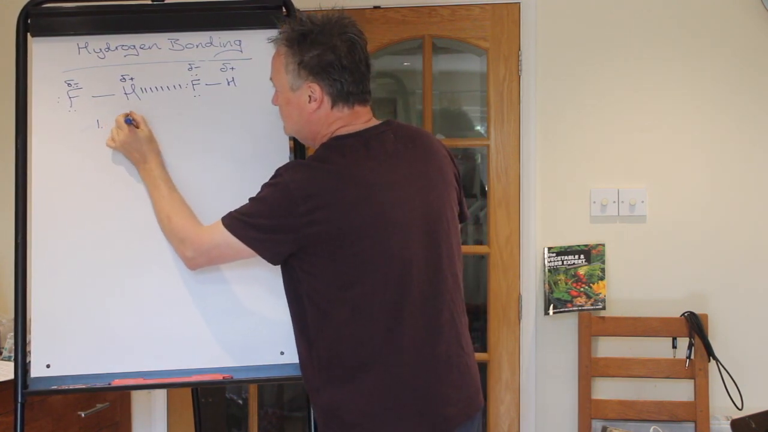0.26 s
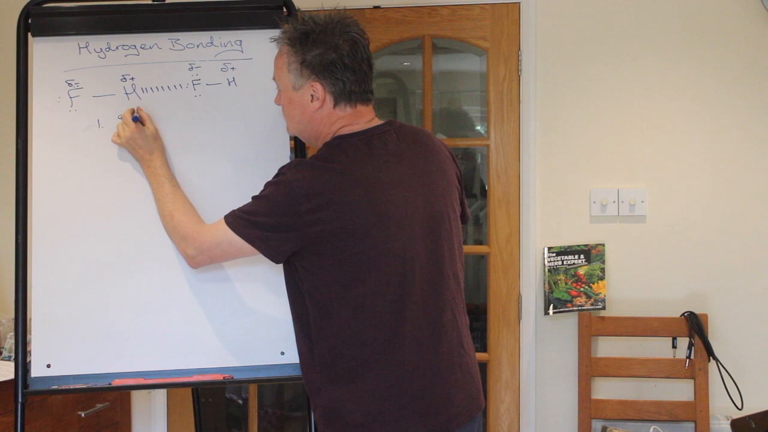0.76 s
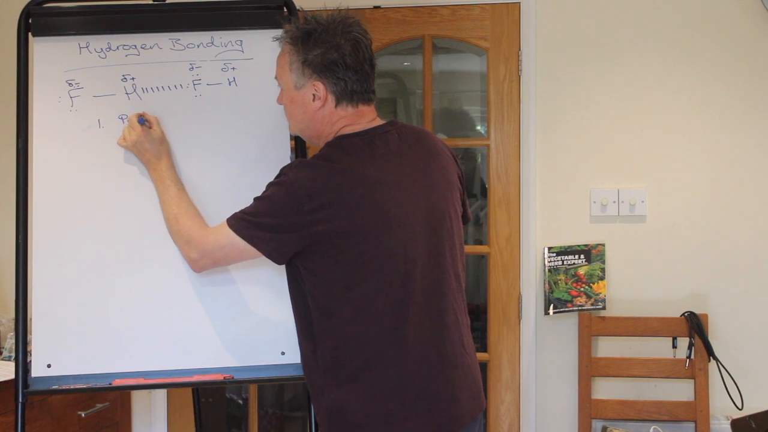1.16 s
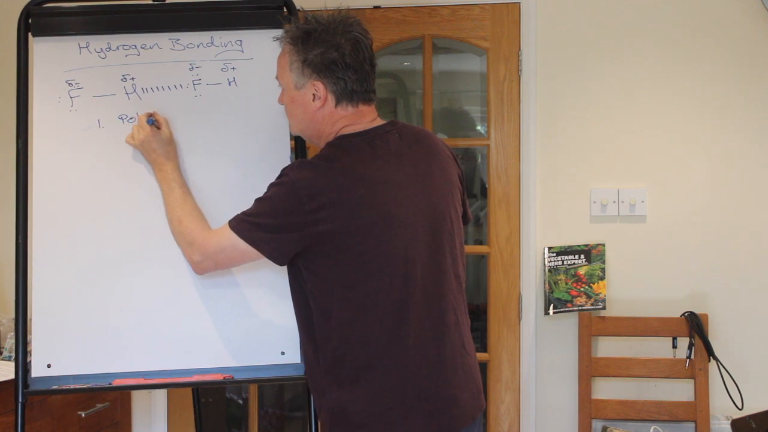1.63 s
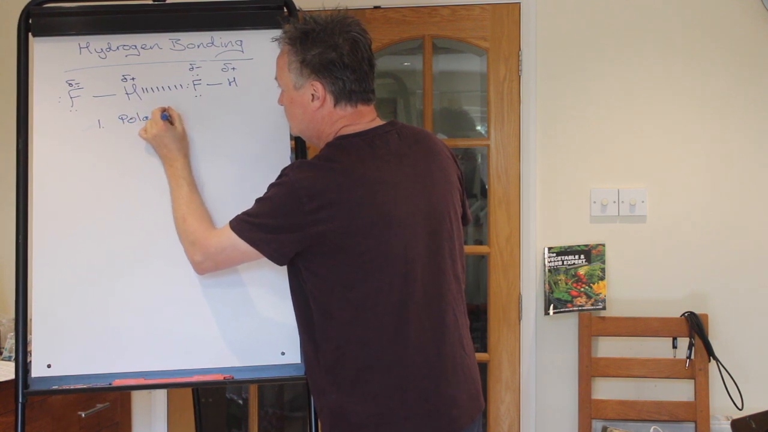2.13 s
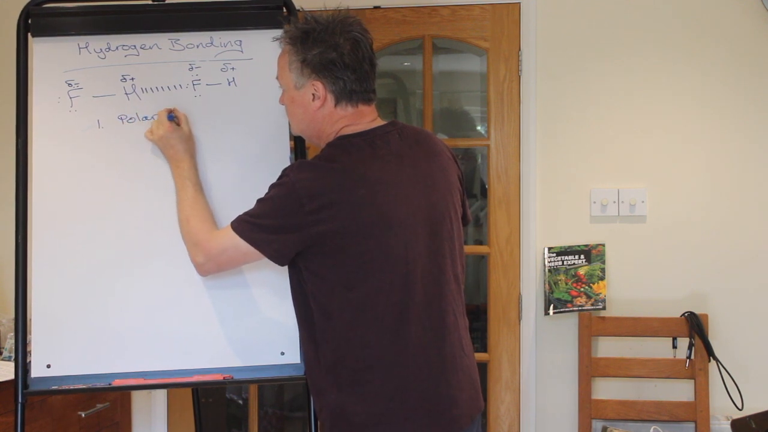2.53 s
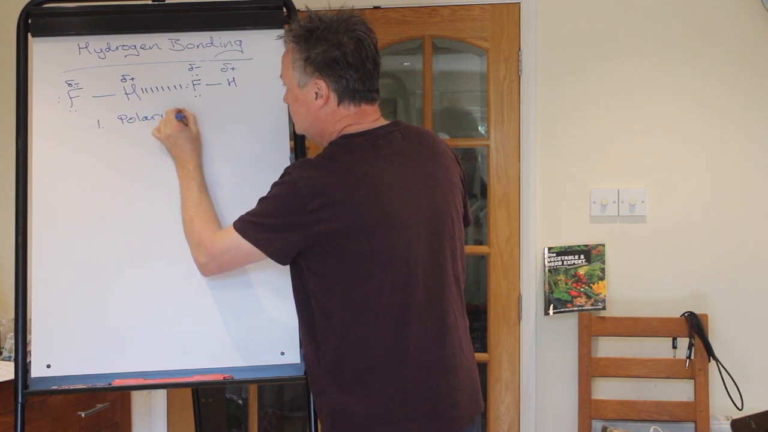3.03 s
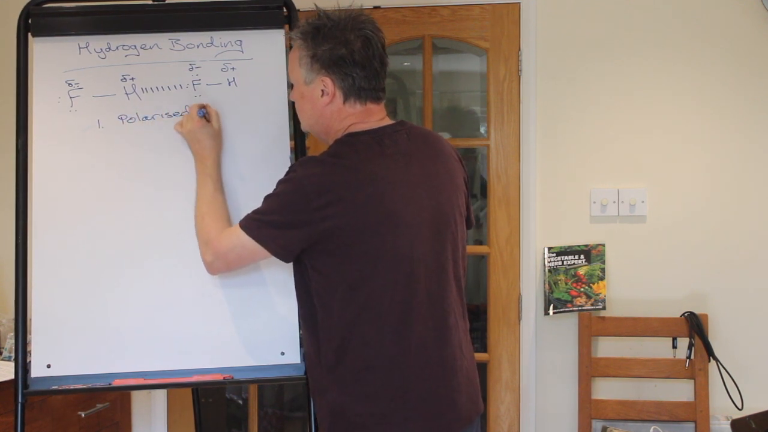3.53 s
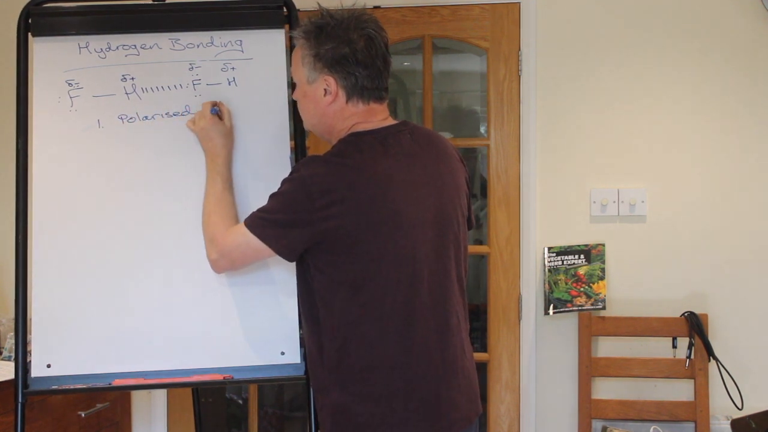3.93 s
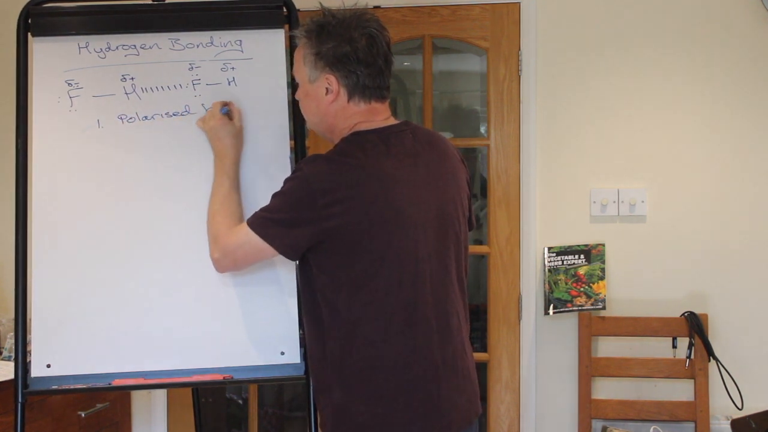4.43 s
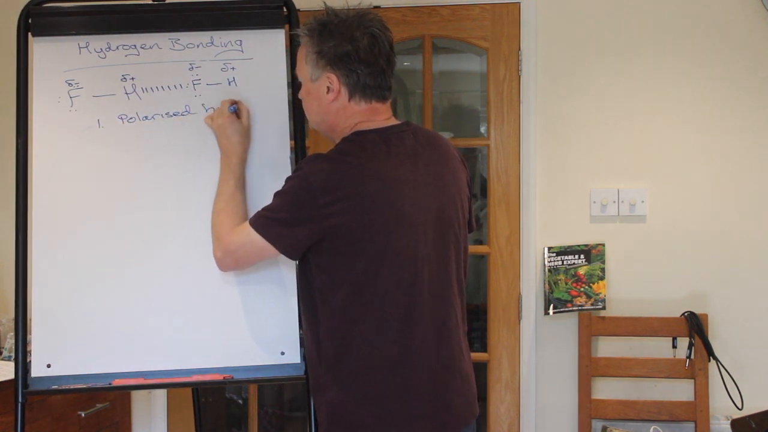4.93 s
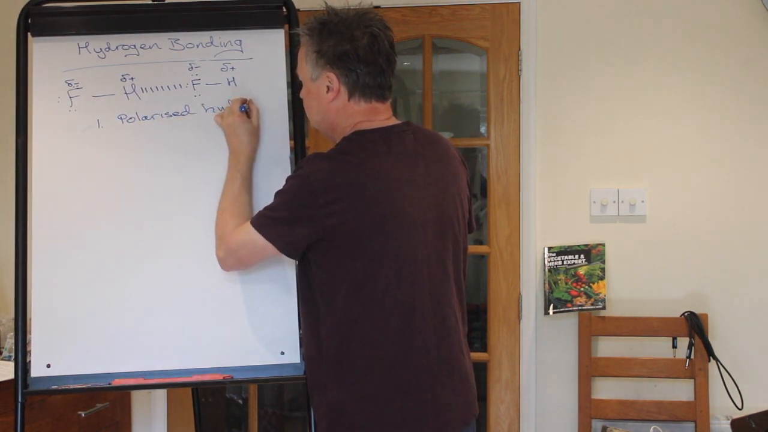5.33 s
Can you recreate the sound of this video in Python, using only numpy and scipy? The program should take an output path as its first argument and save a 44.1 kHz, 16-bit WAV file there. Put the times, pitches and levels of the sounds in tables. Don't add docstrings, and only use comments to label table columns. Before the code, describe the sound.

Someone writes steadily with a felt pen on an easel board. Short airy strokes follow one another irregularly, punctuated by low, boxy knocks when the tip lands; the sharpest comes near two seconds. A low murmur of the dragged board sits underneath. The distant camera microphone picks up room echo, constant soft hiss, faint electrical buzz and a flickering high tone.

```python
import sys
import numpy as np
from scipy import signal
from scipy.fft import rfft, irfft, next_fast_len
from scipy.io import wavfile
from scipy.ndimage import uniform_filter1d, map_coordinates

SR = 44100
rng = np.random.default_rng(int(sys.argv[2]) if len(sys.argv) > 2 else 0)


def volts_from_decibels(level):
    exponent = np.asarray(level, float) / 20
    return 10 ** exponent


def transcribe(signal):
    frames = np.atleast_2d(signal).T
    limited = np.clip(frames, -1, 1)
    pcm = np.round(limited * 32767).astype(np.int16)
    wavfile.write(sys.argv[1], SR, pcm)


N = 245592

# pitch_hz, level_db
AIR_SPECTRUM = [(15, -28.5), (30, -4), (100, -1.5), (300, -5), (600, -5.5), (1000, -6.5), (2500, -10.5),
                (5000, -14.5), (8000, -31), (10000, -23), (15500, -35)]
# pitch_hz, level_db
DRAG_SPECTRUM = [(60, -37.5), (130, -5.5), (200, -0.5), (370, 0), (550, -4), (900, -20), (2000, -41)]
# multiple of the buzz rate, level_db (rms)
BUZZ_PARTIALS = [(41, -81), (49, -79), (51, -80), (59, -83), (67, -80), (73, -77), (77, -76), (79, -80),
                 (80, -79), (85, -81), (97, -87)]
# start_s, end_s, level_db (rms)
WHINE_STRETCHES = [(0, 0.982, -71), (1.28, 1.708, -69), (1.98, 3.972, -69.5), (4.596, 5.57, -70.5),
                   (0.492, 0.608, -64.5), (0.811, 0.83, -67), (0.925, 0.982, -65), (1.288, 1.329, -64),
                   (1.64, 1.71, -77), (3.83, 3.948, -72.5), (4.644, 4.662, -66.5), (4.71, 4.897, -65.5),
                   (4.936, 5.067, -67.5), (5.425, 5.57, -69)]
# fastest_s, felt hiss level_db, rise_s to gain 10 dB, fall_s to lose 10 dB
STROKES = [(.065, -54.5, 0.38, .075), (.385, -58, -0.02, 0.15), (.585, -58.5, 0.47, 0.11),
           (.93, -61.5, .07, .075), (1.165, -60, -0.1, 0.33), (1.32, -56.5, .26, .035),
           (1.39, -58, -0.05, .065), (1.48, -56.5, -0.0097, .21), (1.65, -61.5, 0.03, 0.1),
           (1.81, -53.5, 0.0758, 0.04), (1.956, -56, .008, .13), (2.17, -58.5, .04, -0.0787),
           (2.25, -66, 0.06, 0.13), (2.395, -53.5, 0.1135, 0.0773), (2.6, -61.5, -0.06, 0.0873),
           (2.69, -58.5, .07, 0.1), (2.86, -57.5, 0.05, 0.05), (3.02, -60.5, -0.22, 0.18),
           (3.175, -55.5, 0.08, 0.1836), (3.375, -59, 0.12, 0.12), (3.62, -58.5, 0.08, 0.07),
           (3.78, -58, .21, 0.21), (4.11, -58.5, 0.1, 0.19), (4.38, -53.5, .13, .085),
           (4.58, -59.5, -0.05, 0.14), (4.76, -54, 0.1736, .15), (4.975, -52.5, 0.07, 0.0859),
           (5.125, -61.5, 0.11, .05), (5.29, -54.5, 0.1072, 0.06), (5.48, -57.5, 0.06, 0.29)]
# pitch_hz, level_db
FELT_SPECTRUM = [(1500, -21), (3000, -9), (5000, -8.5), (6300, -2), (7200, -0.5), (8300, -4.5),
                 (9600, -13.5), (11500, -24.5), (14000, -46)]
# contact_s, blow level_db, contact_ms, nib tick_db
LANDINGS = [(0.3362, -35.5, 2.5436, -84), (.833, -47, 4.14, -72), (1.1037, -35, 2.6827, -72),
            (1.95, -23.5, 1.358, -38.5), (2.1594, -24.5, 1.522, -68), (2.5531, -42, 4.52, -78),
            (2.9935, -26, 1.824, -60), (3.5135, -28, 2.19, -70), (3.9827, -29, 1.99, -68),
            (4.5331, -31, 1.987, -65.5), (5.4256, -26.5, 1.625, -51.5)]
# pitch_hz, width_hz, level_db
BOARD_RESONANCES = [
    (369.5, 455, 9.5),
    (147, 33, -7),
]
# delay_ms, gain
NEAR_ECHOES = [(3.6, .6), (6.5, 1.35), (7.8, -.6), (9.05, 1.65), (10.2, -.6), (14.2, .85)]
# delay_ms, gain
FAR_ECHOES_START = [(16.3, .55), (17.9, -.6), (19.9, .45), (23.4, .8), (26.4, -.4), (32.3, -.65),
                    (33.3, .6), (39, .6), (40.2, -.6)]
# delay_ms, gain
FAR_ECHOES_LATER = [(20.5, 0.5), (23.6, 1), (25.7, 1), (27.7, 0.7), (29.8, 1), (36.9, -0.83), (41.9, 0.28),
                    (44.5, 0.66)]
# pitch_hz, level_db, t60_s
STANDING_MODES = [(135, -8, .35), (201, -6, .32), (302, -10, .4), (370, 0, .27), (416, -6, .3),
                  (465, -5, .32), (523, -3, .3), (574, -5, .22), (663, -9, .3), (740, -12, .33),
                  (808, -14, .3), (1025, -20, .22)]
# pitch_hz, level_db, t60_s
EASEL_SWAY = (48, -22, 0.87)
# pitch_hz, level_db, t60_s
BARREL_MODES = [(1038.8, -1.5, 0.414), (1426, -4.5, 0.168), (1623, -1, 0.152), (1941.8, -7, 0.122)]
# pitch_hz, level_db
KNOCK_SPECTRUM = [(400, -30), (900, -2), (1100, 0), (1500, -4), (2000, -10), (2800, -14), (4200, -18),
                  (9000, -50)]
# pitch_hz, level_db
TICK_SPECTRUM = [(2000, -38), (3500, 2.5), (5200, -6.5), (6600, 13.5), (8000, -2), (9500, -22.5),
                 (14000, -50)]
# pitch_hz, t60_s
ROOM_DECAY = [(60, 0.579), (200, 0.4266), (550, 0.3714), (1500, 0.356), (4000, 0.114), (9000, 0.1597)]

BAND_TOP_HZ = 15620
REST_DB = -73


def unit(x):
    return x / np.sqrt(np.mean(x ** 2) + 1e-20)


def along(points, hz):
    f, v = np.transpose(points)
    return np.interp(np.log(hz + 1), np.log(f + 1), v)


def wobble(rate):
    knots = rng.standard_normal(int(N * rate / SR) + 4)
    return map_coordinates(knots, [np.arange(N) * rate / SR])


def filtered(x, response):
    m = next_fast_len(len(x) + SR // 2)
    return irfft(rfft(x, m) * response(np.fft.rfftfreq(m, 1 / SR)), m)[:len(x)]


def coloured_noise(spectrum):
    return unit(filtered(rng.standard_normal(N), lambda f: volts_from_decibels(along(spectrum, f))))


def tail(size, rise_s):
    hz, t, z = signal.stft(rng.standard_normal(size), SR, nperseg=256)
    decay = volts_from_decibels(-60 * t / along(ROOM_DECAY, hz)[:, None])
    x = signal.istft(z * decay, SR, nperseg=256)[1][:size]
    x = x * (1 - np.exp(-(np.arange(size) / SR / rise_s) ** 2))
    return x / np.linalg.norm(x)


def felt_db():
    t = np.arange(N) / SR
    power = volts_from_decibels(2 * REST_DB)
    for fastest_s, level_db, rise_s, fall_s in STROKES:
        tens_down = np.maximum((fastest_s - t) / abs(rise_s), (t - fastest_s) / abs(fall_s)).clip(0, 9)
        power = power + volts_from_decibels(2 * (level_db - 10 * tens_down))
    return 10 * np.log10(power)


def room_air():
    return volts_from_decibels(-56.0 + 0.133 * wobble(2.86)) * coloured_noise(AIR_SPECTRUM)


def mains_buzz():
    t, rate_hz = np.arange(N) / SR, 99.874
    upper = [(k, -90 - .2 * (k - 98)) for k in range(98, 132) if rng.random() < .4]
    buzz = np.zeros(N)
    for multiple, level_db in BUZZ_PARTIALS + upper:
        buzz += volts_from_decibels(level_db + 3) * np.sin(2 * np.pi * (multiple * rate_hz * t + rng.random()))
    return buzz


def whine():
    t, pitch_hz = np.arange(N) / SR, 2204.8
    gate = sum(volts_from_decibels(db + 1) * ((t >= start_s) & (t < end_s)) for start_s, end_s, db in WHINE_STRETCHES)
    level = uniform_filter1d(gate, size=300) * volts_from_decibels(-0.92 + 2.2 * wobble(30))
    return level * np.sin(2 * np.pi * pitch_hz * t + 0.26 * wobble(25))


def board_drag():
    effort_db = uniform_filter1d(felt_db(), round(0.277 * SR))
    swing_db = 0.38 * (effort_db - effort_db.mean())
    return volts_from_decibels(-63 + swing_db + .8 * wobble(5.14)) * coloured_noise(DRAG_SPECTRUM)


def strokes():
    hiss_db = felt_db()
    centre_hz = 7450 - 18 * (hiss_db - REST_DB)
    fibres = rng.standard_normal(N) * volts_from_decibels(1.9 * wobble(400) + .8 * wobble(40))
    hz, t, z = signal.stft(fibres, SR, nperseg=512)
    patches = uniform_filter1d(uniform_filter1d(rng.standard_normal(z.shape), 5, 0), 5, 1)
    slide = np.interp(t, np.arange(N) / SR, centre_hz) / 7200
    colour = volts_from_decibels(along(FELT_SPECTRUM, hz[:, None] / slide ** 0.37) + .9 * unit(patches))
    hiss = volts_from_decibels(hiss_db - 1.5) * unit(signal.istft(z * colour, SR, nperseg=512)[1][:N])
    reverb = signal.fftconvolve(hiss, tail(SR // 2, rise_s=0.00214))[:N]
    return volts_from_decibels(1.2) * hiss + volts_from_decibels(-3) * reverb


def burst(spectrum, size, t60, wet_db):
    crack = volts_from_decibels(-60 * np.arange(size) / SR / t60) * rng.standard_normal(size)
    x = filtered(crack, lambda f: volts_from_decibels(along(spectrum, f)))
    x = x + volts_from_decibels(wet_db) * signal.fftconvolve(x, tail(size, rise_s=0.00563))[:size]
    return np.roll(x, round(.0025 * SR)) / np.abs(x).max()


def board_response(f):
    radiation = (1j * f / (65 + 1j * f)) ** 2
    flexing = sum(volts_from_decibels(db) * 1j * f * width / (hz * hz - f * f + 1j * f * width)
                  for hz, width, db in BOARD_RESONANCES)
    return radiation * flexing


def room_paths(f, far):
    paths = 1.354 / (1 + 1j * f / 1300) ** 2
    echoes = NEAR_ECHOES + [(ms, far * gain) for ms, gain in FAR_ECHOES_START]
    echoes = echoes + [(ms, (1 - far) * gain) for ms, gain in FAR_ECHOES_LATER]
    for delay_ms, gain in echoes:
        paths = paths + gain * np.exp(-2j * np.pi * f * delay_ms / 1000)
    return paths


def lift_db(hz, far):
    return 5 * (1 - far) * np.log2(hz / 370)


def mode_ring(t, push, far):
    ring = np.zeros(len(t))
    for hz, db, t60 in STANDING_MODES:
        level_db = db + lift_db(hz, far) + rng.normal(0, 2.27)
        ring += volts_from_decibels(level_db - 60 * t / t60) * np.sin(2 * np.pi * (hz * t + rng.random()))
    hz, db, t60 = EASEL_SWAY
    ring += volts_from_decibels(db - 60 * t / t60) * np.sin(2 * np.pi * hz * t)
    ring *= 1 - np.exp(-(t / 0.0087) ** 2)
    return signal.fftconvolve(ring, push / push.sum())[:len(t)]


def thump_wash(thump, far):
    def tilt(f):
        hz = f.clip(150, 700)
        return volts_from_decibels(lift_db(hz, far) + 1.642 * np.log2(hz / 370))
    wash = signal.fftconvolve(thump, tail(len(thump), rise_s=0.026))[:len(thump)]
    return filtered(wash, tilt)


def barrel_ring(t):
    ring = sum(volts_from_decibels(db - 60 * t / t60) * np.sin(2 * np.pi * hz * t) for hz, db, t60 in BARREL_MODES)
    return ring * (1 - np.exp(-t / 0.0041))


def taps():
    out, size = np.zeros(N + SR), SR * 3 // 4
    t = np.arange(size) / SR
    for contact_s, blow_db, contact_ms, tick_db in LANDINGS:
        push = np.exp(-((t * 1000 / contact_ms - .6) / 0.1983) ** 2 / 2)
        far = np.interp(contact_s, (1.76, 3.4), [1, 0.35])
        thump = -filtered(push, board_response)
        thump /= np.abs(thump).max()
        sound = filtered(thump, lambda f: room_paths(f, far))
        sound += volts_from_decibels(-6.0) * mode_ring(t, push, far)
        sound += volts_from_decibels(-0.74) * thump_wash(thump, far)
        sound *= volts_from_decibels(blow_db)
        knock_db = blow_db + max(-0.5 - 21.5 * np.log2(contact_ms), -25)
        sound += volts_from_decibels(knock_db - 2.5) * burst(KNOCK_SPECTRUM, size, t60=0.0297, wet_db=6)
        sound += volts_from_decibels(knock_db - 9) * barrel_ring(t)
        sound += volts_from_decibels(tick_db) * burst(TICK_SPECTRUM, size, t60=.04, wet_db=0)
        start = round((contact_s - .6 * contact_ms / 1000) * SR)
        out[start:][:size] += sound
    return out[:N]


def scene():
    background = room_air() + mains_buzz() + whine() + board_drag()
    return (background + strokes() + taps())[None]


def low_pass(x):
    return signal.sosfilt(signal.butter(12, 15620, fs=SR, output="sos"), x)


def record(dry):
    mix = filtered(dry[0], lambda f: f < BAND_TOP_HZ)[None]
    return low_pass(mix)


dry = scene()
out = record(dry)
transcribe(out)
```